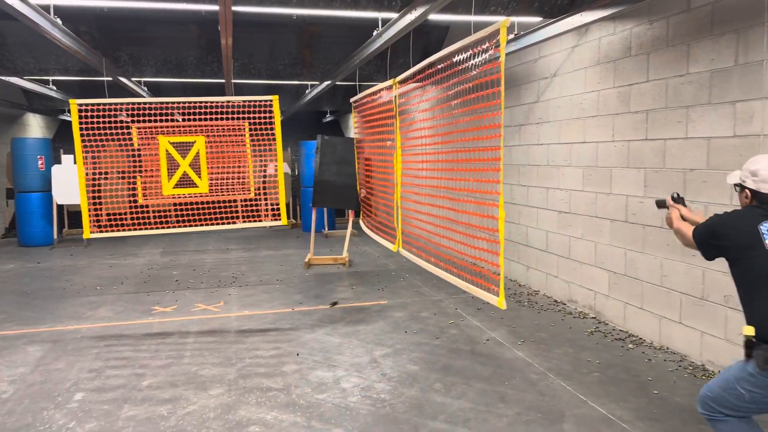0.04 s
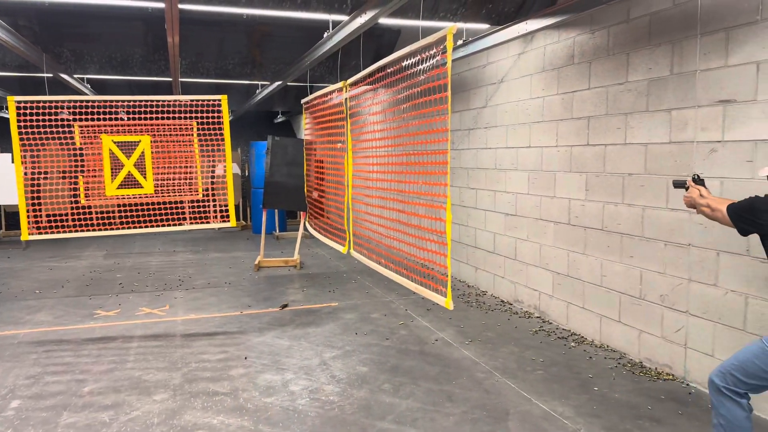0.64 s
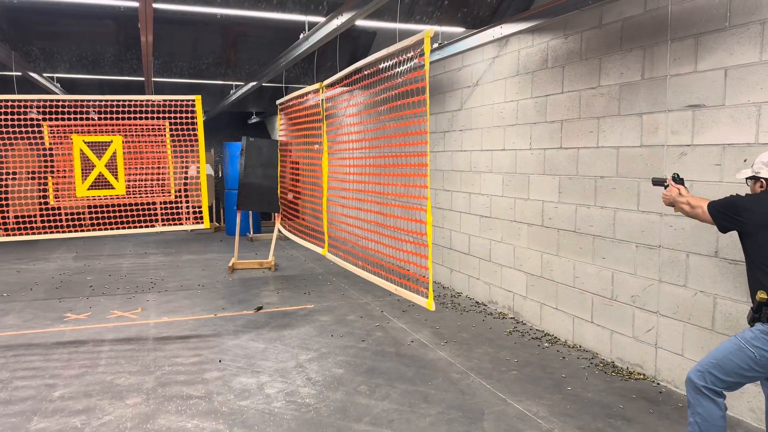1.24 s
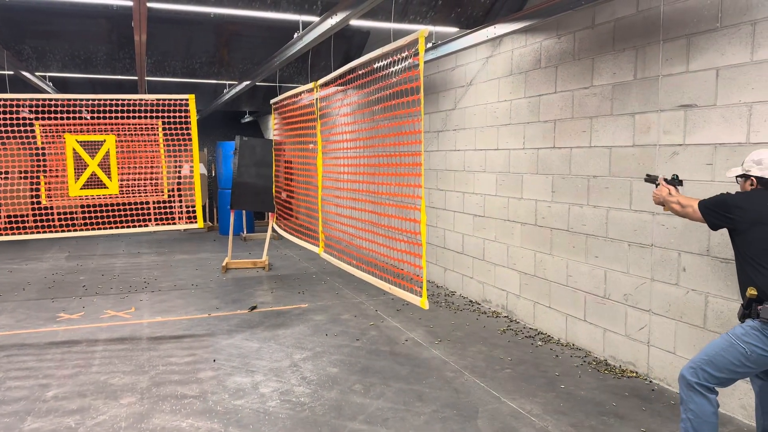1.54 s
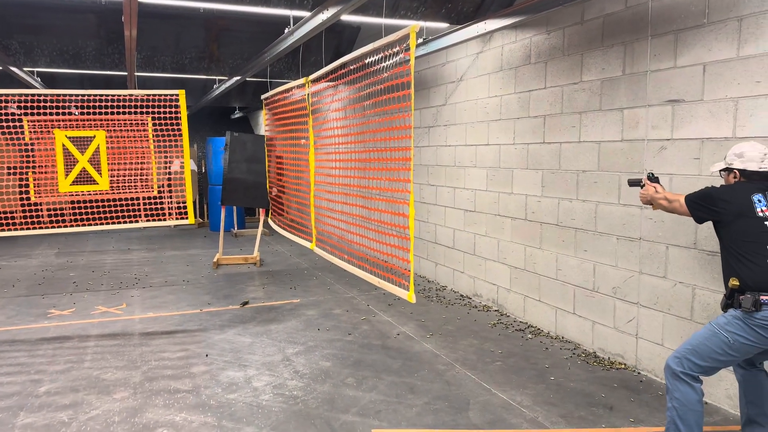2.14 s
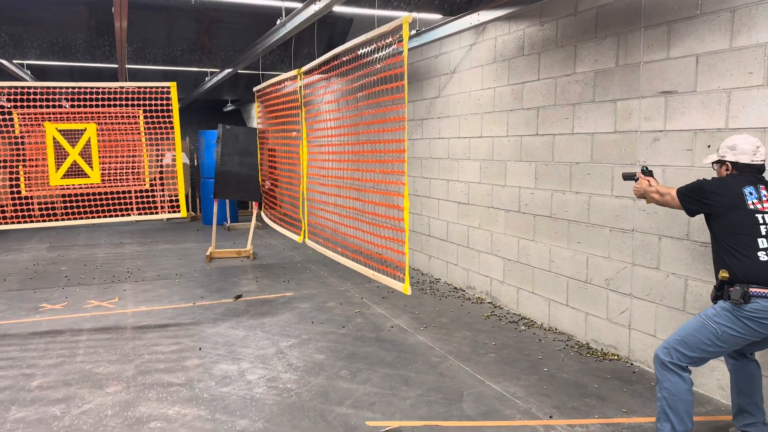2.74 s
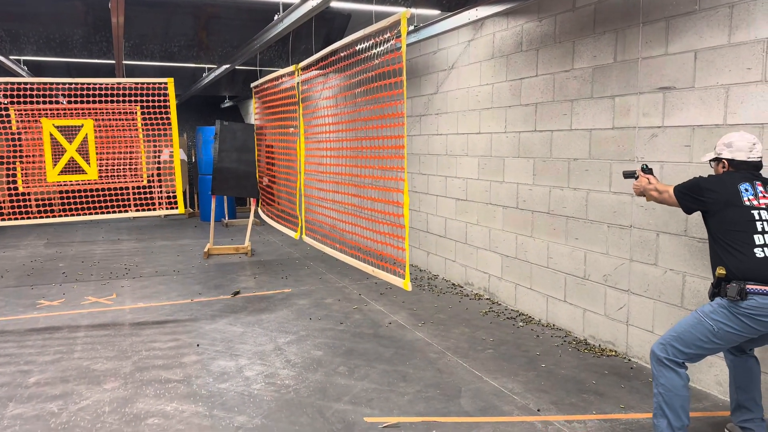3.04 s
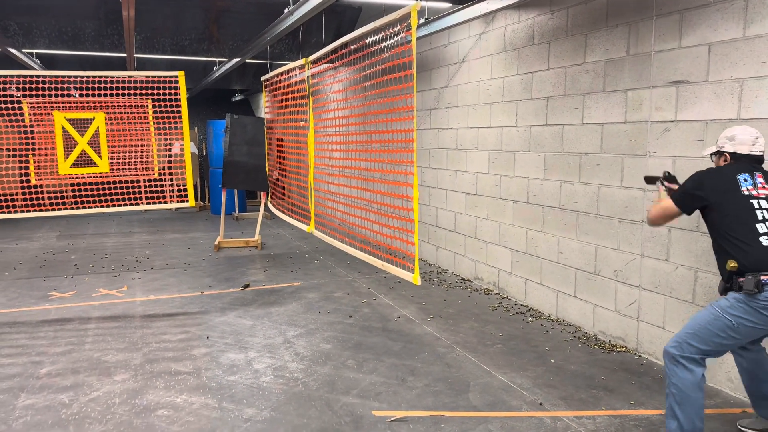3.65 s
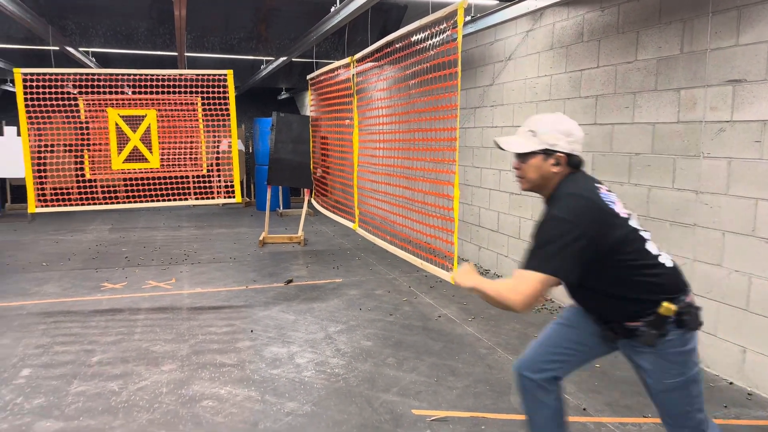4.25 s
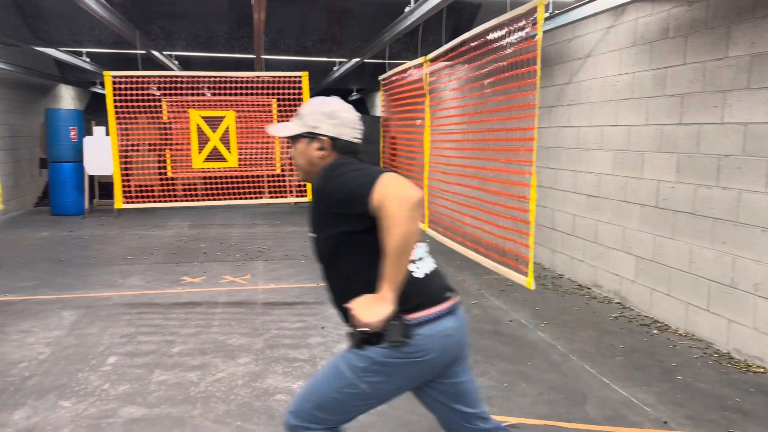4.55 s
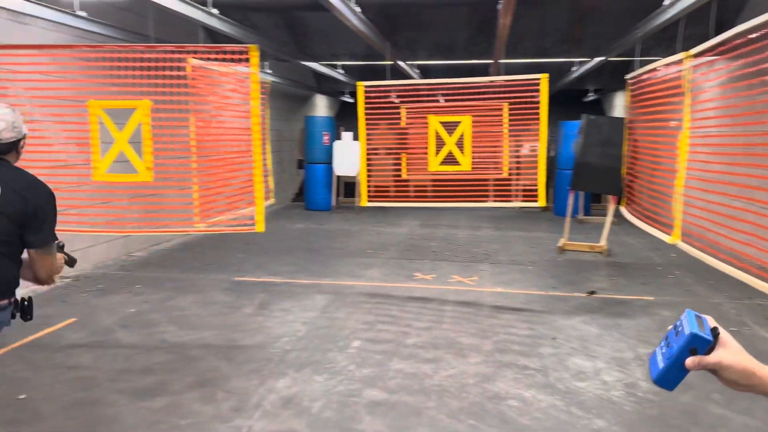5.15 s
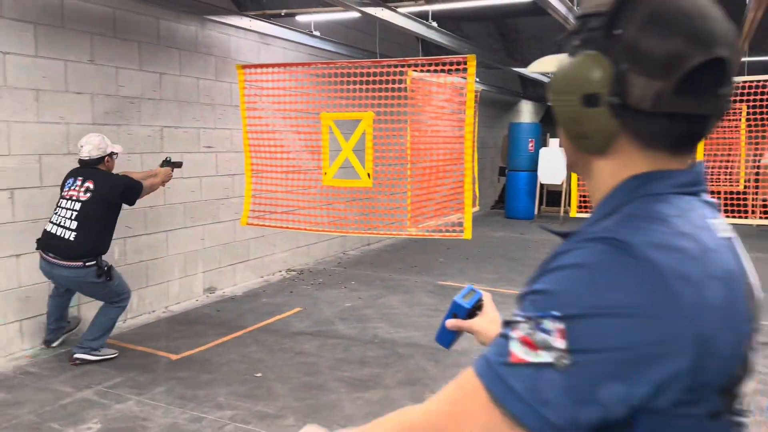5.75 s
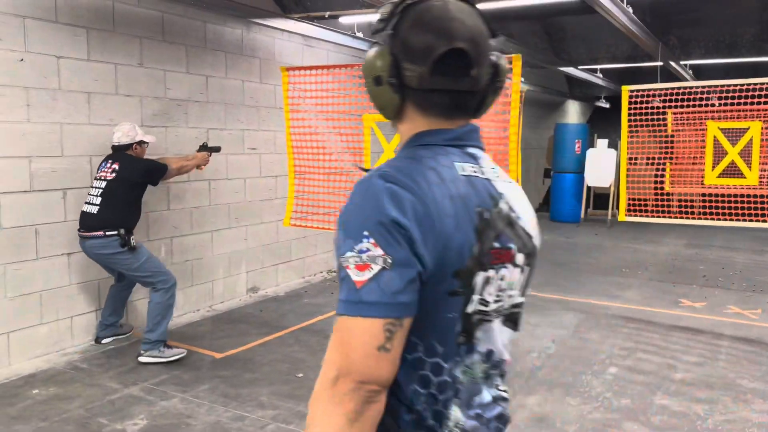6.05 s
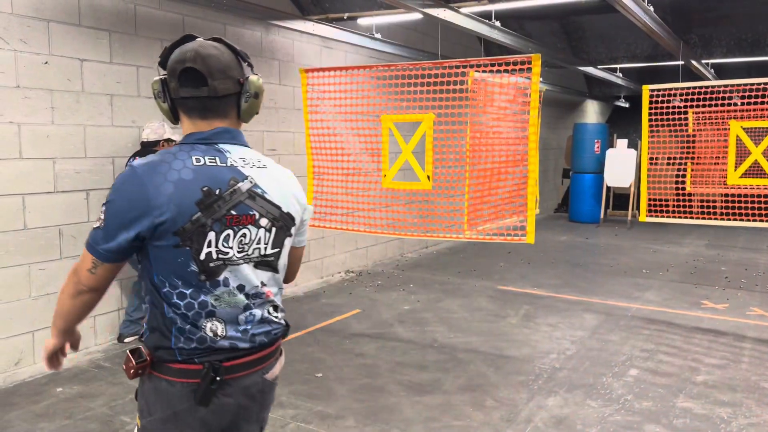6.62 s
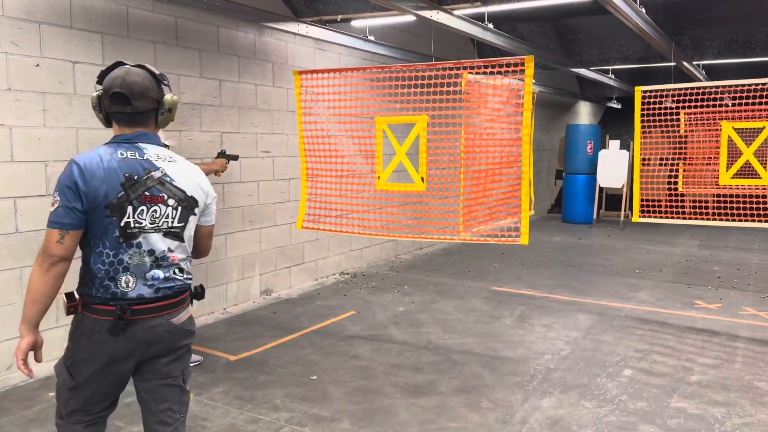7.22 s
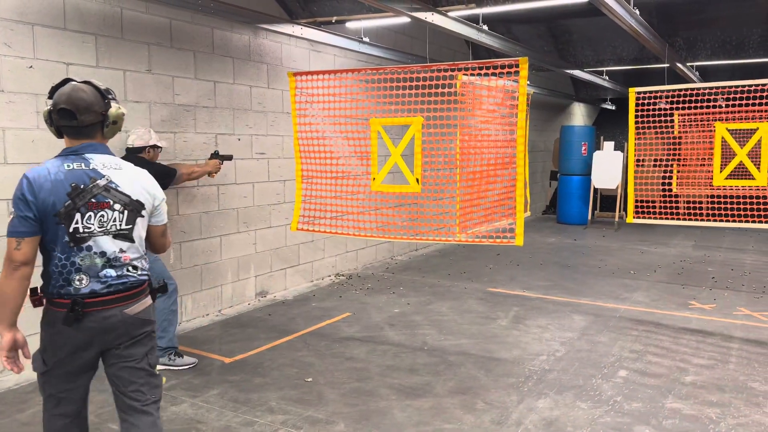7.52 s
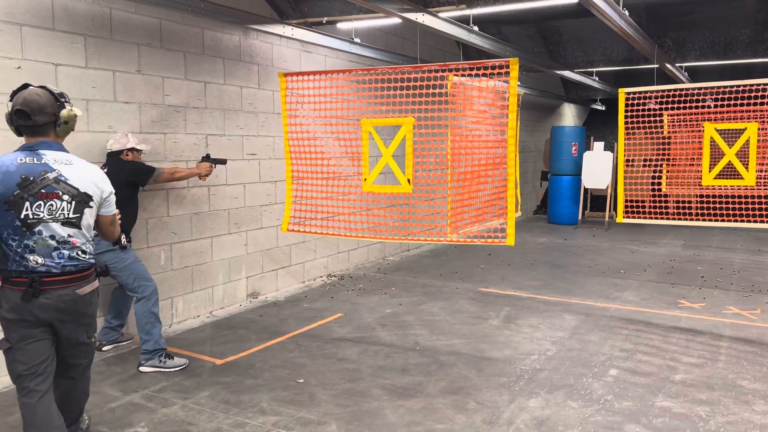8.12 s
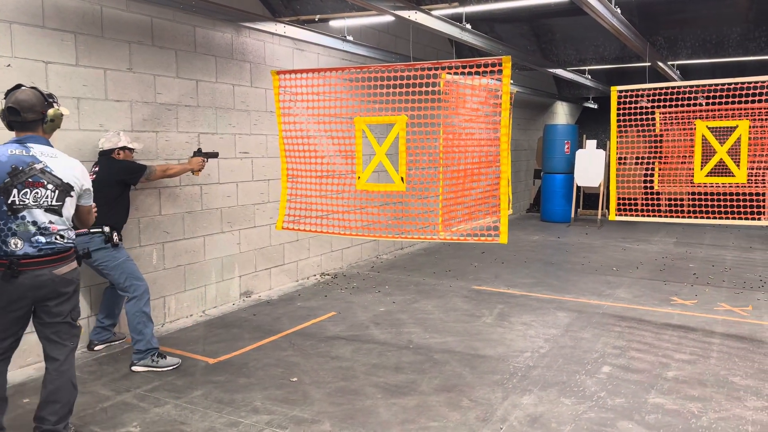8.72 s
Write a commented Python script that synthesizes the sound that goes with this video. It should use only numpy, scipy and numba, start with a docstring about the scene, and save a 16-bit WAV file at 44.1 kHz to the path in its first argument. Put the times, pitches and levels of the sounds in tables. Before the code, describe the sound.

Sharp pistol shots boom through an indoor range, six and then five, with quick footsteps in the pause over low ventilation rumble.

```python
"""A concrete indoor range: a handgun is fired in strings from two spots, a few metres from a phone.
Each shot is a crack, a boom, hard wall echoes and a second of hall; between strings the shooter runs across.
Two soft clicks open the scene over rumbling ventilation. Spent cases bounce and tinkle,
something metal rattles, a sole squeaks, and a muffled shot comes from another bay.
The phone limits every blast and ducks its right side until the hall has faded a little."""
import sys
import numpy as np
from scipy import signal
from scipy.fft import rfft, irfft
from scipy.io import wavfile
from numba import njit

SR = 44100
rng = np.random.default_rng(int(sys.argv[2]) if len(sys.argv) > 2 else 0)


def master(y):
    """Save y as 16-bit WAV."""
    cut = np.clip(np.atleast_2d(y).T, -1, 1)
    pcm = np.round(cut * 32767)  # scale
    wavfile.write(sys.argv[1], SR, pcm.astype(np.int16))


N = 391608
EVENT_SAMPLES = 65536  # one sound with its tail
AGE = np.arange(EVENT_SAMPLES) / SR
FREQS = np.fft.rfftfreq(EVENT_SAMPLES, 1 / SR)

# The hall's answer to a shot. Each row: frequency in Hz, level in dB per Hz, t60 in seconds.
HALL_BANDS = [(29.8, -60.5, 2.7), (83, -56.5, 1.1), (198, -53.5, 1.5), (300, -42.5, 0.96),
              (460, -44, 1.346), (644, -43, 1.023), (960, -39, 1.016), (1380, -41.5, 0.97),
              (2040, -51, 0.93), (2780, -50.5, 0.86), (5070, -54.5, 0.67), (7430, -58, 0.52),
              (11100, -62, 0.37), (14730, -55, 0.23)]


def undb(db):
    """Decibels to gain."""
    return 10 ** (np.asarray(db) / 20)


def along(points, freqs):
    """Read (Hz, value) points on a log-frequency axis."""
    hz, value = np.transpose(points)[:2]
    return np.interp(np.log(freqs + 1), np.log(hz), value)


def add(out, start_s, sound):
    """Mix a stereo sound in at start_s."""
    start = max(int(start_s * SR), 0)
    out[:, start:start + sound.shape[1]] += sound[:, :N - start]


def wander(turns, size=EVENT_SAMPLES):
    """Random curve that drifts around zero with a spread near 1."""
    corners = 1.2 * rng.standard_normal(turns + 1)
    return np.interp(np.linspace(0, turns, size), np.arange(turns + 1), corners)


def diffuse_noise(size=EVENT_SAMPLES):
    """Spectrum of white noise at both microphones; long waves reach both much alike."""
    # Each row: frequency in Hz, likeness of the two sides from 0 to 1.
    likeness = [(60, 0.7), (250, 1), (1000, 0.4), (1900, 0)]
    left, other = rfft(rng.standard_normal((2, size))) * np.sqrt(SR / 2)
    alike = along(likeness, np.fft.rfftfreq(size, 1 / SR))
    return np.array([left, alike * left + np.sqrt(1 - alike ** 2) * other])


def coloured(spectrum, colour):
    """Sound of a spectrum shaped by an EQ curve of (Hz, dB) points."""
    return irfft(spectrum * undb(along(colour, FREQS)))


def reverberate(spectrum, colour, build_s, clump_db=1.33, ripple_db=1.6):
    """Hall tail: reflections thicken over build_s and arrive in clumps; each band dies at its own rate."""
    # The hall's resonances. Each row: centre in Hz, width in Hz, boost in dB.
    resonances = [(82, 10, 3.5), (158.8, 40, 7.5), (291, 18, 5), (358, 12, 7), (454.3, 39, 4.5),
                  (563, 10, 6), (772, 31, 3), (1024, 13, 3)]
    ringing_db = sum(db / (1 + (2 * (FREQS - centre) / width) ** 2) for centre, width, db in resonances)
    comb_db = ripple_db * wander(turns=260, size=len(FREQS))  # surfaces near the source comb its sound
    spectrum = spectrum * undb(along(colour, FREQS) + ringing_db + comb_db)
    band_hz, _, band_t60 = np.transpose(HALL_BANDS)
    tail = 0
    for solo, t60 in zip(np.eye(len(band_hz)), band_t60):
        band = irfft(spectrum * along(np.c_[band_hz, solo], FREQS))
        fade_db = clump_db * wander(turns=90) - 60 * AGE / t60
        tail = tail + band * undb(fade_db)
    return tail * (1 - np.exp(-AGE / build_s))


def ventilation(fan_hz=291, fan_db=-80):
    """A bed of low air rumble with one faint fan tone."""
    # Moving air. Each row: frequency in Hz, level in dB per Hz.
    air_colour = [(25, -106), (50, -84.5), (90, -89.5), (150, -95.5), (300, -101), (600, -110),
                  (1500, -118), (5000, -129), (15000, -138)]
    air_eq = undb(along(air_colour, np.fft.rfftfreq(N, 1 / SR)))
    air = irfft(diffuse_noise(N) * air_eq, N)
    fan = undb(fan_db) * np.sqrt(2) * np.sin(2 * np.pi * fan_hz * np.arange(N) / SR)
    return air + fan


def clicks_and_steps(hall_db=-9, knock_s=0.0043, attack_share=0.14, plain_slap_s=0.0091):
    """Two short soft clicks at the very start, later the shooter's steps on concrete; the hall answers."""
    # Two clicks, then the steps. Each row: start in seconds, level in dB, decay in seconds.
    hits = [(.008, -9.5, 0.021), (.024, -11, 0.027), (4.612, -9.5, 0.0033), (4.872, -1, 0.0044),
            (5.053, -8, 0.013), (5.194, -11.5, 0.0061), (5.362, -14.5, 0.011), (5.558, -21.5, 0.0099),
            (5.86, -29.5, 0.091)]
    # A hit's slap and low knock (in a step, sole and heel). Each row: frequency in Hz, level in dB per Hz.
    slap_colour = [(40, -74.5), (180, -77), (450, -78.5), (1000, -79), (1900, -86), (2800, -85),
                   (5000, -96), (9000, -100), (15000, -110)]
    knock_colour = [(60, -82), (200, -69), (700, -74), (1500, -91), (4000, -110)]
    out = np.zeros((2, N))
    octaves = np.minimum(np.log2((FREQS + 100) / 1000), 2)
    for start_s, db, decay_s in hits:
        db_per_octave = 0.8 * np.log2(decay_s / plain_slap_s)  # longer hits sound brighter
        tilt = undb(db + db_per_octave * octaves)
        envelope = np.exp(-AGE / decay_s) * (1 - np.exp(-AGE / (attack_share * decay_s)))
        slap = coloured(diffuse_noise() * tilt, slap_colour) * envelope
        knock_gain = undb(db) * np.sqrt(knock_s / decay_s)  # shorter hits knock harder
        knock = knock_gain * coloured(diffuse_noise(), knock_colour) * np.exp(-AGE / knock_s)
        hall = reverberate(diffuse_noise() * tilt, slap_colour, build_s=0.017)
        add(out, start_s, knock + slap + undb(hall_db) * hall)
    return out


def wall_echoes(strongest_s, db, push_s, gap_s=.0078, dull_hz=900, spread_s=.00057, uneven=.12, count=10):
    """The blast flutters between the walls: dulled, longer on each return, each from a new direction."""
    echoes = 0
    for turn, (bearing, jitter) in enumerate(rng.uniform(-1, 1, (count, 2)), -2):
        delay_s = max(strongest_s + gap_s * turn * (1 + uneven * jitter), 1 / SR)
        lateness = delay_s / strongest_s
        stretched_s = push_s * np.sqrt(lateness)
        wave = (1 - AGE / stretched_s) * np.exp(-AGE / stretched_s)  # a sharp push, then longer suction
        gain = undb(db - 9 * abs(np.log2(lateness)))  # 9 dB down at half or twice the strongest's delay
        arrivals_s = delay_s + spread_s * bearing * np.array([[1], [-1]])
        echoes = echoes + gain * rfft(wave) * np.exp(-2j * np.pi * FREQS * arrivals_s)
    return -irfft(echoes / (1 + 1j * FREQS / dull_hz))


def gunshots(crack_s=0.0043, crack_trim_db=-2, boom_rise_s=0.0075, kept=0.62, crossing_s=5):
    """Crack, boom and hall. Shots from one spot share reflections; the rest change as the shooter sways."""
    # Each row: start in seconds, level in dB, crack offset in dB, boom offset in dB.
    shots = [(.768, 1.5, 6.5, 0), (1.079, 2, -7, -0.5), (1.521, 1, 2, 0.5), (1.909, 0.5, -7, 0),
             (2.508, -1.5, -3.5, -1), (3.271, -1, -8, 0), (6.451, 3, -9.5, -2), (6.722, 2, -1, -2),
             (7.356, 0, 0, -1), (8.157, -1, -4.5, -5.5), (8.493, -1, -6.5, -7.5)]
    # The firing spots before and after the shooter crosses. Each row: boom length in seconds,
    # then the strongest wall echo's delay in seconds, level in dB and push length in seconds.
    firing_spots = [(.078, .034, 3.5, .0008), (0.094, .0222, 5.5, 0.00064)]
    # The bright crack and the low boom. Each row: frequency in Hz, level in dB per Hz.
    crack_colour = [(100, -47.5), (450, -36), (1200, -38), (2500, -42), (5000, -51), (9000, -54.5),
                    (15000, -55.5)]
    boom_colour = [(28, -78.5), (50, -37.5), (90, -39.5), (170, -44.5), (320, -34.5), (500, -33.5),
                   (900, -55), (3000, -77)]
    out = np.zeros((2, N))
    acoustics = [(diffuse_noise(), diffuse_noise(), wall_echoes(*echo), boom_s)
                 for boom_s, *echo in firing_spots]
    fresh = np.sqrt(1 - kept ** 2)
    for start_s, db, crack_db, boom_db in shots:
        far_walls, near_walls, echoes, boom_s = acoustics[int(start_s > crossing_s)]
        crack = coloured(diffuse_noise(), crack_colour) * np.exp(-AGE / crack_s)
        # the boom comes late and rolls between the near walls for about a tenth of a second
        roll = (1 - np.exp(-AGE / boom_rise_s)) ** 2 * np.exp(-(AGE / boom_s) ** 2.7)
        boom = coloured(kept * near_walls + fresh * diffuse_noise(), boom_colour) * roll + echoes
        hall = reverberate(kept * far_walls + fresh * diffuse_noise(), HALL_BANDS, build_s=0.017)
        shot = undb(crack_trim_db + crack_db) * crack + undb(boom_db) * boom + hall
        add(out, start_s, undb(db) * shot)
    return out


def spent_cases(detune=.003, tumble_db=5, tick_s=.018, landings=4, hop_ratio=.74, bounce_loss_db=1.5):
    """Brass bounces in shrinking hops; each landing ticks on concrete and rings unevenly as it tumbles."""
    # Each row: first landing in seconds, level in dB, first hop in seconds, ring pitch in Hz.
    drops = [(3.04, -80, .085, 10900), (3.991, -77.5, .409, 10600), (4.558, -75.5, .242, 10600),
             (7.164, -69.5, .399, 10740)]
    # The ring of a case. Each row: multiple of its pitch, level in dB, t60 in seconds.
    brass_modes = [(1, 1, .38), (1.004, -4.5, .38), (1.351, -8.5, .12)]
    # The landing tick. Each row: frequency in Hz, level in dB per Hz.
    tick_colour = [(1000, -54.5), (5000, -37.5), (11000, -45), (15000, -31.5)]
    out = np.zeros((2, N))
    for landing_s, db, hop_s, pitch_hz in drops:
        for bounce, pitch_jitter in enumerate(rng.standard_normal(landings)):
            ring_hz = pitch_hz * (1 + detune * pitch_jitter)
            tinkle = coloured(diffuse_noise(), tick_colour) * np.exp(-AGE / tick_s)
            for multiple, mode_db, t60 in brass_modes:
                envelope = undb(mode_db + tumble_db * wander(turns=150) - 60 * AGE / t60)
                tinkle += envelope * np.sin(2 * np.pi * ring_hz * multiple * AGE)
            add(out, landing_s, undb(db - bounce_loss_db * bounce) * tinkle)
            landing_s += hop_s * hop_ratio ** bounce
    return out


def metal_rattle(start_s=4.548, decay_s=0.065, hall_db=-7):
    """Something small and metal rattles once as the shooter runs by."""
    # A thin clink. Each row: frequency in Hz, level in dB per Hz.
    clink_colour = [(1500, -122), (3000, -106), (4500, -101), (6000, -107), (15000, -116)]
    clink = coloured(diffuse_noise(), clink_colour) * np.exp(-AGE / decay_s)
    hall = reverberate(diffuse_noise(), clink_colour, build_s=.015)
    out = np.zeros((2, N))
    add(out, start_s, clink + undb(hall_db) * hall)
    return out


def sole_squeak(start_s=5.85, length_s=.17, peak_hz=662, db=-71, bend=.12, hall_db=1, hall_t60_s=1.0):
    """The shooter settles into his stance: a rubber sole's soft tone rises and falls with the pressure."""
    pressure = np.sin(np.pi * np.minimum(AGE / length_s, 1))
    pitch_hz = peak_hz * (1 - bend * (1 - pressure))
    tone = undb(db) * pressure ** 2 * np.sin(2 * np.pi * np.cumsum(pitch_hz) / SR)
    reflections = rng.standard_normal((2, EVENT_SAMPLES)) * undb(-60 * AGE / hall_t60_s)
    hall = irfft(rfft(tone) * rfft(reflections)) / np.linalg.norm(reflections[0])
    out = np.zeros((2, N))
    add(out, start_s, tone + undb(hall_db) * hall)
    return out


def next_bay_shot(start_s=6.322, swell_s=0.031):
    """A shot behind a wall arrives only as reverberation, which swells in."""
    # The muffled blast. Each row: frequency in Hz, level in dB per Hz.
    muffled_colour = [(30, -73.5), (150, -59.5), (400, -58.5), (1100, -61), (2200, -73.5), (6000, -80),
                      (15000, -90)]
    swell = 1 - np.exp(-np.square(AGE / swell_s))
    out = np.zeros((2, N))
    add(out, start_s, swell * reverberate(diffuse_noise(), muffled_colour, build_s=0.028))
    return out


@njit
def follow(level, attack_s, release_s):
    """Envelope that rises and falls at different speeds."""
    attack, release = 1 / (1 + attack_s * SR), 1 / (1 + release_s * SR)
    out, envelope = np.empty(len(level)), 0.
    for i in range(len(level)):
        envelope += (level[i] - envelope) * (attack if level[i] > envelope else release)
        out[i] = envelope
    return out


def duck(x, threshold_db, knee_db, depth_db, attack_s, release_s):
    """Gain that drops by up to depth_db as the sound passes the threshold."""
    level_db = 20 * np.log10(follow(np.abs(x), attack_s, release_s) + 1e-9)
    over = (level_db - threshold_db) / knee_db
    return undb(-depth_db * (1 + np.tanh(over)) / 2)


def limiter(x, ceiling_db, attack_s, release_s):
    """One gain for both channels, turned down while the peaks exceed the ceiling."""
    envelope = follow(np.abs(x).max(axis=0), attack_s, release_s)
    return x / np.maximum(envelope / undb(ceiling_db), 1)


def scene():
    """Everything that sounds in the range."""
    return (gunshots() + next_bay_shot() + clicks_and_steps() + sole_squeak() + metal_rattle()
            + spent_cases() + ventilation())


def record(dry, low_cut_hz=42, high_cut_hz=15400, right_lead_s=.00026, mirror_hz=7400, mirror_lead_s=.000315):
    """The phone ducks its right side under each blast, then limits and soft-clips both sides."""
    # The bass escapes the ducking. Each row: frequency in Hz, share that ducks from 0 to 1.
    ducked_share = [(140, 0), (300, .85), (600, 1)]
    freqs = np.fft.rfftfreq(N, 1 / SR)
    dry = signal.sosfilt(signal.butter(3, low_cut_hz, "high", fs=SR, output="sos"), dry)
    left, right = rfft(dry)
    gain = duck(dry[1], threshold_db=-14.5, knee_db=3.0, depth_db=10.5, attack_s=0.0059, release_s=0.01)
    right = right - rfft((1 - gain) * dry[1]) * along(ducked_share, freqs)
    right = right * np.exp(2j * np.pi * freqs * right_lead_s)
    # above mirror_hz the right side is the left, inverted and slightly early
    mirrored = -left * np.exp(2j * np.pi * freqs * mirror_lead_s)
    crossfade = np.clip((freqs - mirror_hz) / 400 + .5, 0, 1)
    right = (1 - crossfade) * right + crossfade * mirrored
    limited = limiter(irfft(np.array([left, right]), N), ceiling_db=-3.0, attack_s=0.0004, release_s=0.025)
    high_cut = signal.ellip(10, .2, 70, high_cut_hz, fs=SR, output="sos")
    return signal.sosfilt(high_cut, np.tanh(limited))


dry = scene()
out = record(dry)
master(out)
```